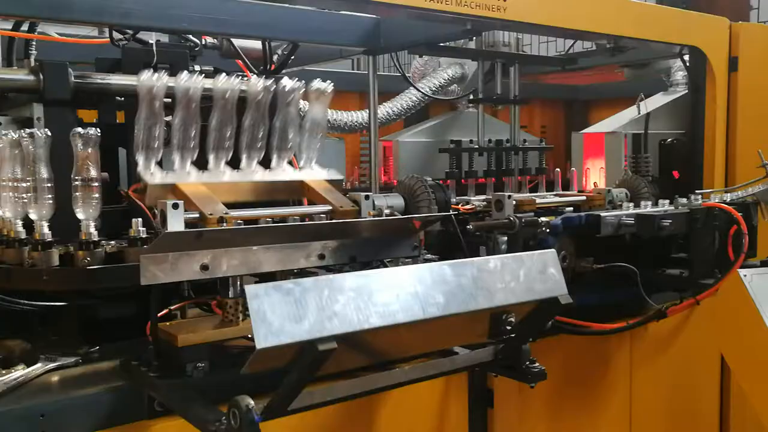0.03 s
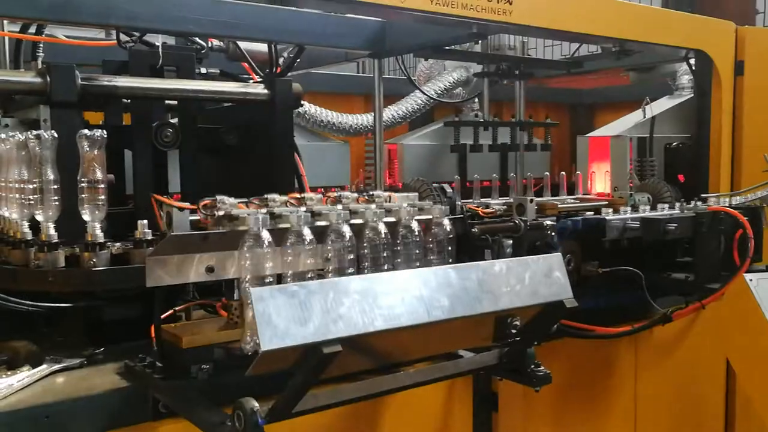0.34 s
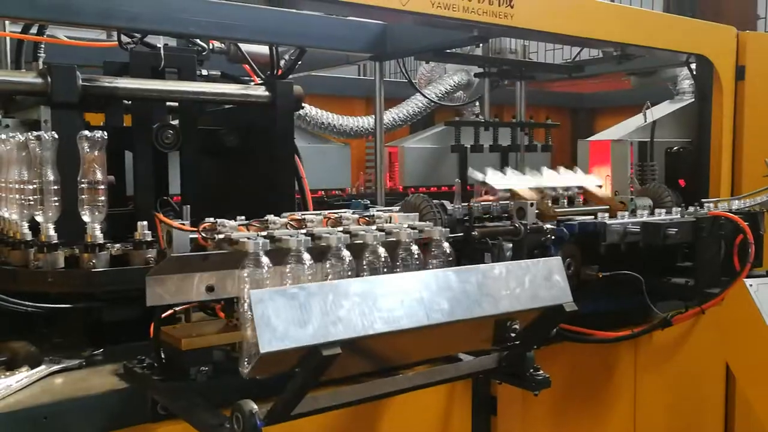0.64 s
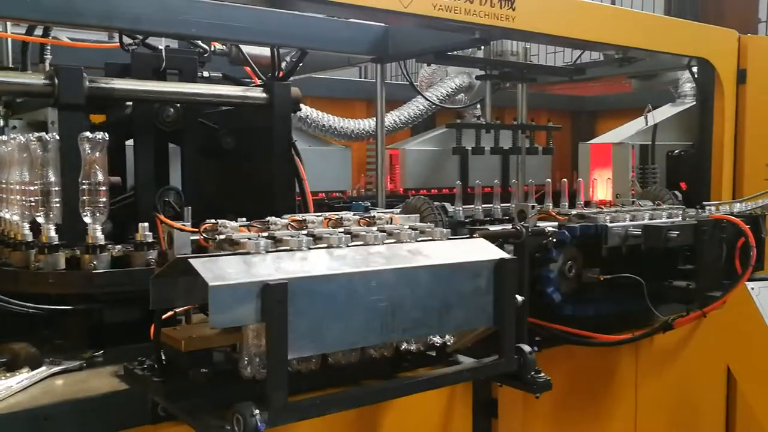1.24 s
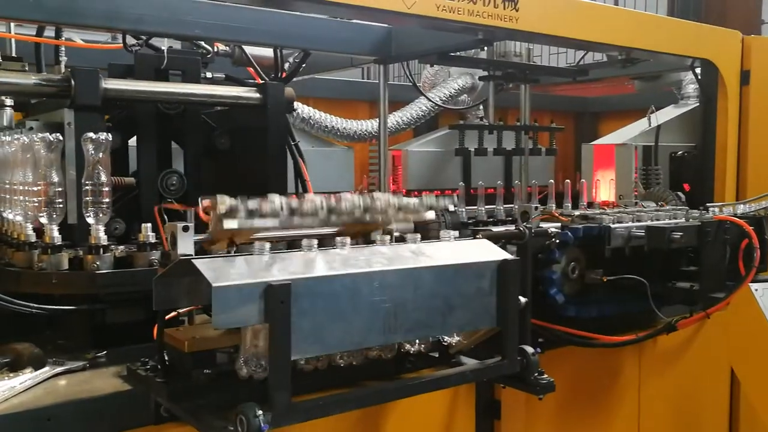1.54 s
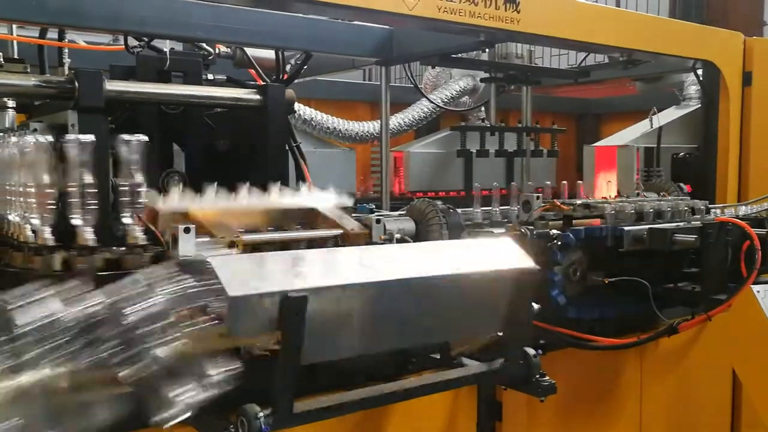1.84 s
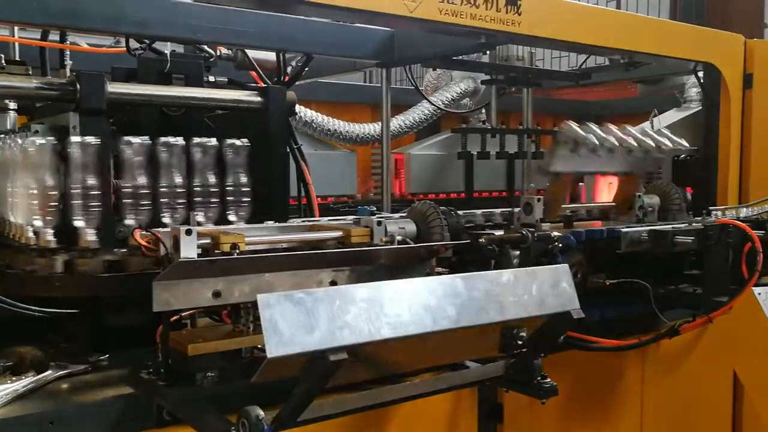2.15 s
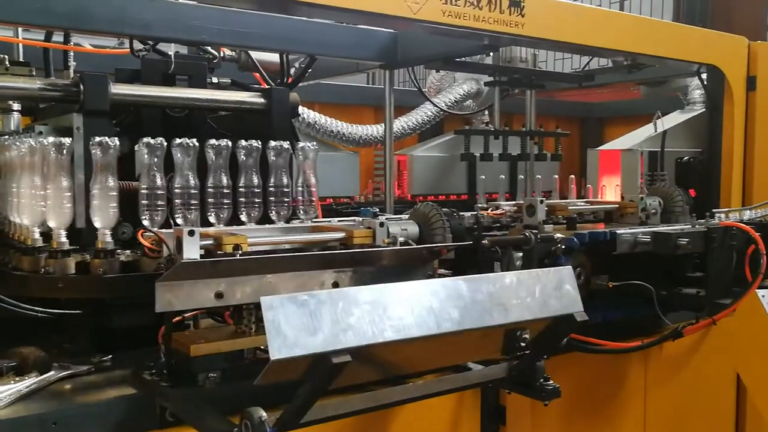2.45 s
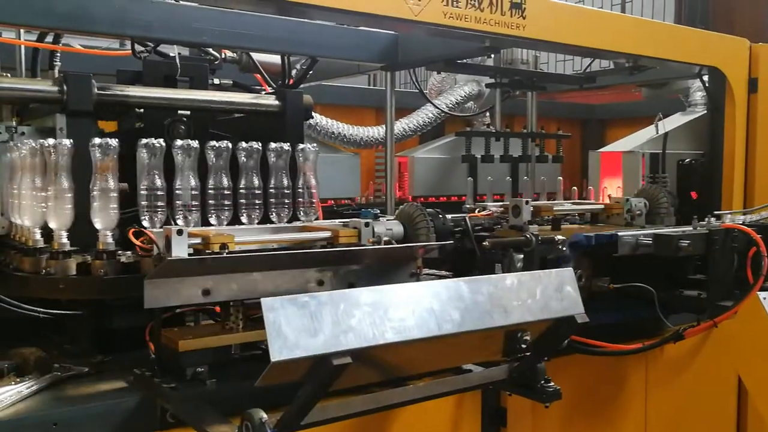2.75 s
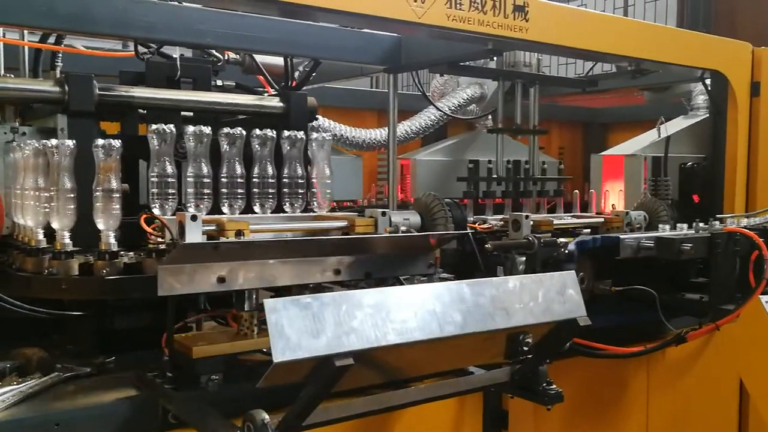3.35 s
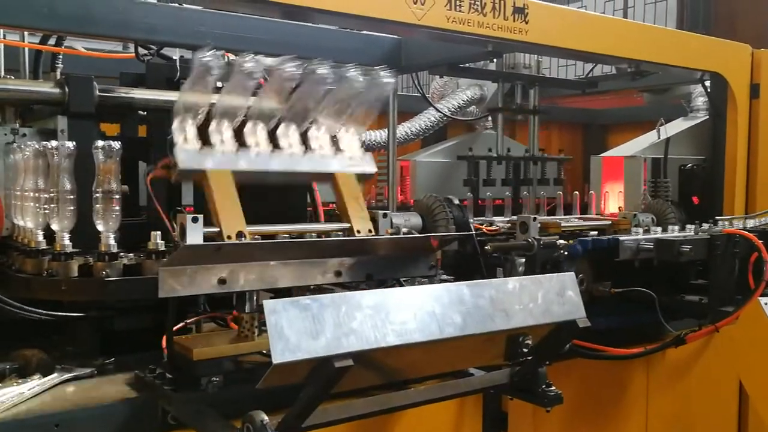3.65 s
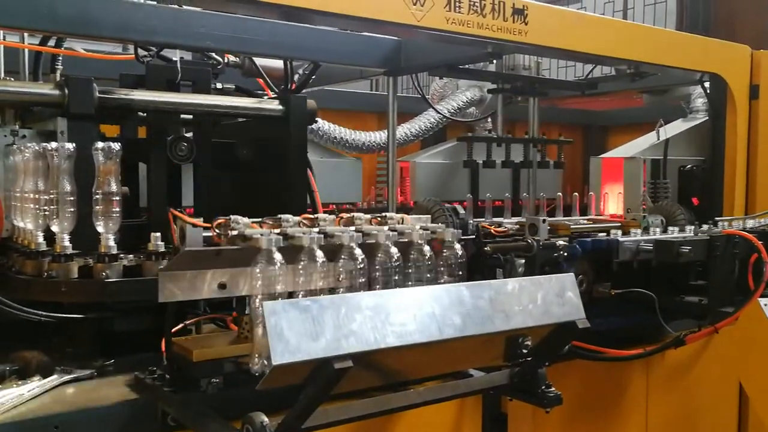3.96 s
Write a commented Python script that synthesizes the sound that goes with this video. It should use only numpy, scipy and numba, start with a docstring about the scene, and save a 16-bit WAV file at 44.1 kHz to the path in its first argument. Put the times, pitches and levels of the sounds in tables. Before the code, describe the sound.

A bottle blowing machine hisses and rattles, releasing one loud blast of compressed air.

```python
"""Hissing air, two throbbing piston compressors and a rattling chain: a bottle blowing machine runs one
cycle in a factory hall, with the stereo microphone standing off its open side. The mould shuts with a thud,
air squeals into the bottles and is dumped in one loud blast; valves puff, the carriage rolls and the chain
scrapes on. The recorder's gain ducks under the blast and creeps back."""
import sys
import numpy as np
from scipy import signal
from scipy.fft import rfft, irfft
from scipy.io import wavfile
from scipy.ndimage import uniform_filter1d
from numba import njit

SR = 44100
rng = np.random.default_rng(int(sys.argv[2]) if len(sys.argv) > 2 else 0)


def inscribe(sig):
    """Save sig as 16-bit PCM at rate SR to the path in sys.argv[1].

    A 1-D sig is mono; a 2-D sig holds one channel per row.
    Samples are clipped to [-1, 1] before scaling.
    """
    pcm = np.round(np.clip(np.atleast_2d(sig).T, -1, 1) * 32767)
    wavfile.write(sys.argv[1], SR, pcm.astype(np.int16))


N = 176400
TIME = np.arange(N) / SR
FREQ = np.maximum(np.fft.rfftfreq(N, 1 / SR), 1)


def undb(db):
    """Decibels to gain."""
    return 10 ** (np.asarray(db) / 20)


def unit(x):
    """Scale to rms 1."""
    return x / np.sqrt(np.mean(x ** 2))


def curve(rows):
    """Join (time [s], value) rows by straight lines."""
    return np.interp(TIME, *np.array(rows).T)


def colour(rows, hz=FREQ):
    """Gain from (frequency [Hz], gain [dB]) rows."""
    f, db = np.array(rows).T
    return undb(np.interp(np.log(hz), np.log(f), db))


def shape(x, gain):
    """Filter by a gain per frequency; rms 1."""
    return unit(irfft(rfft(x) * gain, N))


def pan(db):
    """Left and right gains from an L-R difference."""
    return undb(np.array([[1], [-1]]) * db / 2)


def noise(alike=0.):
    """Stereo noise with a given likeness of the channels."""
    return np.sqrt(1 - alike) * rng.standard_normal((2, N)) + np.sqrt(alike) * rng.standard_normal(N)


def walk(hz):
    """Random wander of spread 1, slower than about hz."""
    return shape(rng.standard_normal(N), 1 / (1 + (FREQ / hz) ** 4))


def envelope(start, length, attack_s, fall_s):
    """Rise, hold, exponential fall."""
    rise = np.clip((TIME - start) / attack_s, 0, 1)
    return rise * np.exp(-np.maximum(TIME - start - length, 0) / fall_s)


def tone(hz):
    """Sine of rms 1 on a moving pitch."""
    return np.sqrt(2) * np.sin(2 * np.pi * np.cumsum(hz) / SR)


def room(x, wet_db, t60_s=.19):
    """Add the diffuse ring of cabinet and hall around the microphone."""
    tail = rng.standard_normal((2, N)) * undb(-60 * TIME / t60_s)
    tail *= undb(wet_db) / np.sqrt(np.sum(tail ** 2) / 2)
    ring = signal.fftconvolve(x * np.ones((2, 1)), tail, axes=1)[:, :N]
    return (x + ring) / np.hypot(1, undb(wet_db))


def cabinet(ripple_db, width_hz=45):
    """Fine peaks and dips from panel reflections, different on each side of the microphone."""
    grid = np.arange(0, SR / 2, width_hz)
    ripple = [np.interp(FREQ, grid, row[:len(grid)]) for row in rng.standard_normal((2, N))]
    return undb(ripple_db * np.array(ripple))


def leak():
    """Constant hiss of escaping air, wide at the microphone, over the rumble of the hall."""
    # spectra of leak and hall (frequency [Hz], gain [dB])
    hiss_colour = [(260, -41), (450, -34), (554, -10.5), (606, -7), (633, -10), (918, -6), (1000, -11),
                   (1100, -6), (1200, -8.5), (1370, -5.5), (1770, -9.5), (1900, -9), (2340, -4.5),
                   (3660, -6), (8930, 1), (10500, -1), (15700, -13)]
    hall_colour = [(18, -12), (35, -8), (70, -7), (120, 3), (230, 3), (340, 0), (480, -12), (700, -24)]
    # where the hiss sits (frequency [Hz], L-R [dB])
    hiss_pan = [(400, 9), (700, 1), (1290, -1), (2380, -3.5), (4400, 3.5), (8100, 3.5), (15000, 0.5)]
    # its drift (time [s], level [dB])
    hiss_level = [(.4, -17), (.85, -18.5), (1.1, -17.5), (1.6, -19.5), (2.0, -16.5), (2.4, -16),
                  (3.0, -16.5), (4.0, -17)]
    low_cut = 1 / np.sqrt(1 + (400 / FREQ) ** 8)
    sides = pan(20 * np.log10(colour(hiss_pan)))
    gain = colour(hiss_colour) * low_cut * sides * cabinet(ripple_db=2.4, width_hz=28)
    air = shape(noise(alike=.032), gain) * undb(curve(hiss_level) + .3 * walk(hz=9.9))
    hall = shape(noise(alike=.99), colour(hall_colour) / (1 + (FREQ / 900) ** 4))
    return air + undb(-34.5) * hall


def compressor(spectrum, turn_hz, db, spread_hz=380):
    """The same clatter on every turn of the crank; its bass is alike on both sides."""
    harmonics = turn_hz * np.arange(3, 44)
    turn = np.linspace(0, 1, 2048)
    clatter = 0
    for hz, gain in zip(harmonics, colour(spectrum, harmonics)):
        offset, skew = rng.standard_normal(2)
        side_phase = np.array([[1], [-1]]) * skew * (hz / spread_hz) ** 2.65
        clatter += gain * np.sin(2 * np.pi * (hz / turn_hz * turn + offset) + side_phase)
    running = np.array([np.interp(TIME * turn_hz % 1, turn, side) for side in clatter])
    return undb(db) * unit(running) * undb(1.8 * walk(hz=34))


def compressors():
    """Two piston compressors throb against each other at slightly different speeds."""
    # clatter spectra (frequency [Hz], gain [dB])
    slower = [(40, -34), (66, -8), (78, -7), (110, -16), (165, -6), (205, 5), (250, -4), (330, -7),
              (480, -14)]
    faster = [(30, -24), (48, -7), (70, 3), (82, 0.5), (115, -6), (175, -3), (215, -17), (400, -13)]
    return compressor(slower, turn_hz=11.075, db=-34.5) + compressor(faster, turn_hz=11.665, db=-37.5)


def motors():
    """Steady hum, and the wavering whine of the drive while the chain runs."""
    # hum tones (frequency [Hz], level [dB])
    hum_tones = [(297.8, -42), (376.7, -47.5)]
    # drive whine (time [s], level [dB])
    whine_level = [(2.52, -55), (2.58, -30), (2.66, -32), (2.72, -38), (2.95, -36), (3.2, -43), (3.28, -34),
                   (3.36, -55)]
    hum = sum(undb(db + .74 * walk(hz=2.7)) * tone(hz + .5 * walk(hz=6)) for hz, db in hum_tones)
    whine = undb(curve(whine_level) + 2.5 * walk(hz=25)) * tone(hz=2880 + 24 * walk(hz=40))
    return hum + room(whine, wet_db=-4)


def steel(links_per_s=500, spread_db=4.5):
    """Chain links rattle and end stops knock, all ringing the same steel frame."""
    # frame resonances (frequency [Hz], width [Hz], gain [dB])
    modes = [(476, 82, -6.5), (740, 160, -7), (994, 107, 0), (1192, 57, 1), (1405, 100, -1),
             (1970, 270, -2.5), (2570, 280, -3.5), (2850, 150, -7), (4270, 620, -8.5)]
    # moving carriers (time [s], level [dB])
    rattle_level = [(.4, -29.5), (.62, -47), (.7, -30.5), (.86, -28.5), (.98, -43), (1.12, -31.5),
                    (1.35, -32.5), (1.62, -35.5), (1.9, -29.5), (2.1, -28), (2.35, -21.5), (2.55, -25.5),
                    (2.77, -26.5), (3.0, -33), (3.3, -39.5), (3.52, -30.5), (3.7, -45), (4, -33)]
    # end stops (time [s], level [dB], brightness [dB/octave], fall [s])
    stops = [(.66, -22, -3, .018), (.672, -20, 6, .018), (.822, -27, 2, .02), (1.08, -27, 0, .03),
             (1.105, -24, -1, .03), (1.345, -28, 0, .02), (1.485, -28, -3, .03), (2.005, -28, -1, .03),
             (2.126, -17.5, 3, .025), (2.193, -24, -1, .015), (2.325, -22, 1, .02), (2.38, -22, -2, .018),
             (2.542, -24, 0, .015), (2.73, -17.5, 3, .02), (3.12, -25, 3, .02), (3.17, -28, -1, .02),
             (3.461, -26, 1, .02)]
    power = sum(undb(db) ** 2 / (1 + ((FREQ - hz ** 2 / FREQ) / width) ** 2) for hz, width, db in modes)
    frame = np.sqrt(power) * cabinet(ripple_db=4) / (1 + (FREQ / 6000) ** 2)
    links = (rng.random(N) < links_per_s / SR) * rng.choice([-1, 1], N)
    links = unit(links * undb(spread_db * rng.standard_normal(N)))
    rattle = shape(room(links, wet_db=1) + .82 * noise(alike=.2), frame) * undb(curve(rattle_level))
    crack = noise(alike=.27)
    knocks = sum(shape(crack, frame * undb(tilt * np.log2(FREQ))) * undb(db) * envelope(s, 0, .0015, fall)
                 for s, db, tilt, fall in stops)
    return (rattle + knocks) * pan(db=-1)


def bottles():
    """Hollow plastic bottles bonk, right of centre."""
    # bonks (time [s], level [dB])
    hits = [(.503, -26), (3.313, -21)]
    # bottle modes (frequency [Hz], gain [dB], t60 [s])
    modes = [(576, 0, .14), (640, -6, .08), (985, -11, .12)]
    bonks = sum(undb(db + mode_db) * envelope(s, 0, .001, t60 / np.log(1000))
                * np.sin(2 * np.pi * hz * (TIME - s)) for s, db in hits for hz, mode_db, t60 in modes)
    return room(bonks, wet_db=-6) * pan(db=-4)


def valves():
    """Small valves let off short, bright puffs of air."""
    # puffs (time [s], length [s], level [dB], L-R [dB])
    puffs = [(0.804, .05, -22.5, -2), (1.07, 0.039, -27, 0), (2.018, 0.051, -14, 3)]
    # jet spectrum (frequency [Hz], gain [dB])
    jet_colour = [(1000, -18), (4000, -9), (7000, -4), (10500, -0.5), (13000, -8), (15500, -11)]
    jet = shape(noise(), colour(jet_colour))
    return sum(jet * undb(db) * pan(side_db) * envelope(s, length, attack_s=.015, fall_s=.022)
               for s, length, db, side_db in puffs)


def thuds():
    """The heavy mould and carriage thud, each hit one low, dying tone."""
    # impacts (time [s], level [dB], frequency [Hz], fall [s])
    hits = [(.812, -22, 34, .025), (1.668, -18.5, 38, .014), (2.32, -27, 248.5, 0.11),
            (3.145, -22, 75.4, 0.02)]
    return sum(undb(db) * envelope(s, .006, .005, fall) * np.sin(2 * np.pi * hz * (s - TIME))
               for s, db, hz, fall in hits)


def blowing(wobble_hz=30, flutter_db=1.8):
    """Air rushes into the bottles while a valve on the left squeals in spurts, sinking in pitch."""
    # filling air (time [s], level [dB])
    fill_level = [(.85, -39), (.93, -23.5), (1.1, -27.5), (1.35, -29), (1.6, -38.5)]
    # its spectrum (frequency [Hz], gain [dB])
    fill_colour = [(3500, -56), (5200, -7), (6200, -2), (7700, -6), (9000, -6), (12000, -22)]
    # valve squeal (time [s], pitch [Hz])
    pitch = [(.92, 3950), (.955, 3915), (.98, 3870), (1.04, 3885), (1.14, 3920), (1.24, 3882), (1.31, 3845),
             (1.42, 3825), (1.53, 3800)]
    # its spurts (time [s], length [s], level [dB])
    spurts = [(.923, .016, -27), (.951, .018, -22.5), (.981, .016, -27.5), (1.005, .014, -27.5),
              (1.03, .012, -31), (1.068, .08, -39), (1.222, .034, -29), (1.3, .07, -39),
              (1.387, .03, -34.5), (1.477, .035, -37.5)]
    rush = shape(noise(), colour(fill_colour)) * undb(curve(fill_level))
    gate = sum(undb(db) * envelope(s, length, attack_s=.006, fall_s=.006) for s, length, db in spurts)
    squeal = gate * undb(flutter_db * walk(hz=110)) * tone(curve(pitch) + wobble_hz * walk(hz=118))
    return rush * pan(db=-3) + room(squeal, wet_db=-6) * pan(db=10)


def exhaust(start_s=1.669, end_s=1.786, swell_db_per_s=42):
    """The blowing air is dumped in one turbulent blast that swells as the valve opens."""
    # blast spectrum (frequency [Hz], gain [dB])
    blast_colour = [(150, -9), (260, -9), (480, -7), (700, -7), (950, -2), (1200, -1.5), (1420, 0),
                    (1900, -3.5), (2800, -2.5), (3400, -3), (4400, -3.5), (5500, -4.5), (8500, -3),
                    (11000, -5.5), (15700, -12)]
    # where it sits (frequency [Hz], L-R [dB])
    blast_pan = [(300, 1), (1300, -1), (3000, -0.5), (8000, 2), (15000, 3.5)]
    gain = colour(blast_colour) * pan(20 * np.log10(colour(blast_pan))) * cabinet(ripple_db=1)
    level_db = -12 + swell_db_per_s * (np.clip(TIME, start_s, end_s) - start_s)
    gate = envelope(start_s, end_s - start_s, attack_s=.008, fall_s=.04)
    blast = shape(noise(alike=.055), gain) * undb(level_db + .5 * walk(hz=70)) * gate
    return room(blast, wet_db=-3)


def carriage():
    """The carriage rumbles as it moves the bottles along."""
    # rolling (time [s], level [dB])
    roll_level = [(2.05, -52), (2.28, -34), (2.34, -27), (2.45, -28), (2.6, -37), (2.9, -34), (3.3, -46),
                  (4, -38)]
    # its spectrum (frequency [Hz], gain [dB])
    roll_colour = [(70, -20), (130, 3.5), (250, 3), (330, 0.5), (440, -3.5), (600, -13.5), (1000, -39)]
    rumble = shape(noise(alike=.75), colour(roll_colour) / (1 + (FREQ / 1500) ** 4))
    return rumble * undb(curve(roll_level))


def scrape():
    """Right of the microphone the chain slides along its guide with a gritty, fluttering rasp."""
    # sliding (time [s], level [dB])
    rasp_level = [(2.2, -45), (2.35, -29.5), (2.5, -45), (2.6, -29.5), (2.76, -31), (2.9, -32), (3.05, -35),
                  (3.13, -32), (3.22, -39), (3.4, -37), (3.53, -29), (3.7, -34), (4, -37)]
    # its spectrum (frequency [Hz], gain [dB])
    rasp_colour = [(1000, -14), (1800, -9), (2500, -1), (2900, -5), (3400, -5), (5200, -10.5), (8000, -23)]
    rasp = shape(noise(), colour(rasp_colour))
    return rasp * undb(curve(rasp_level) + 2 * walk(hz=40)) * pan(db=-8.5)


def scene():
    """The whole machine, heard from its open side."""
    bed = leak() + compressors() + motors()
    return bed + steel() + bottles() + valves() + thuds() + blowing() + exhaust() + carriage() + scrape()


@njit
def follow(x, attack, release):
    """Follower that rises fast and sinks slowly."""
    out, level = np.empty(len(x)), 0.
    for i in range(len(x)):
        level += (x[i] - level) * (attack if x[i] > level else release)
        out[i] = level
    return out


def record(dry):
    """The recorder cuts in after silence; its gain control ducks under loud air, and the top is cut."""
    start_s, top_hz = .389, 15800
    threshold_db, ratio, attack_s, release_s, makeup_db = -18, 4.04, .06, .35, 3
    level_db = 10 * np.log10(uniform_filter1d(np.mean(dry ** 2, axis=0), size=441) + 1e-12)
    excess_db = np.maximum(level_db - threshold_db, 0)
    duck_db = follow(excess_db * (1 - 1 / ratio), 1 / (attack_s * SR), 1 / (release_s * SR))
    ducked = dry * undb(makeup_db - duck_db) * (TIME >= start_s)
    low_pass = signal.ellip(10, .2, 75, top_hz, fs=SR, output="sos")
    return signal.sosfilt(low_pass, np.clip(ducked, -1, 1))


dry = scene()
out = record(dry)
inscribe(out)
```